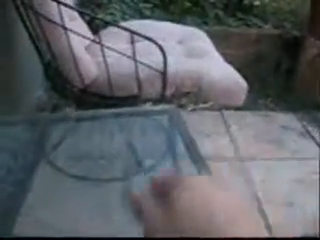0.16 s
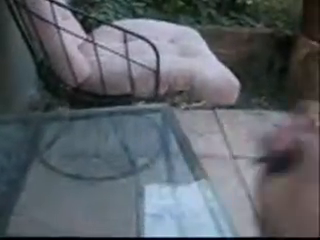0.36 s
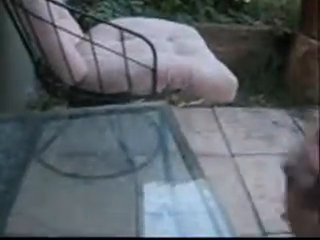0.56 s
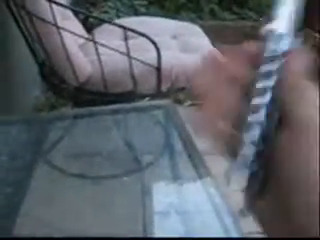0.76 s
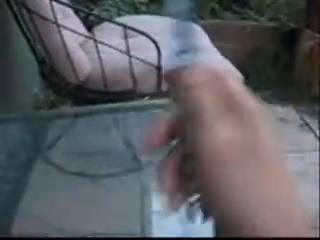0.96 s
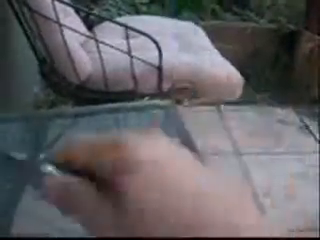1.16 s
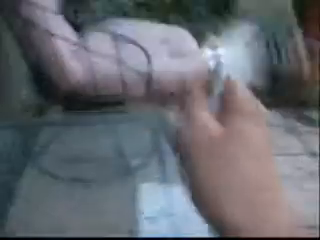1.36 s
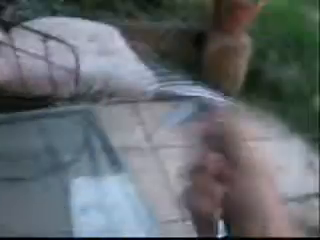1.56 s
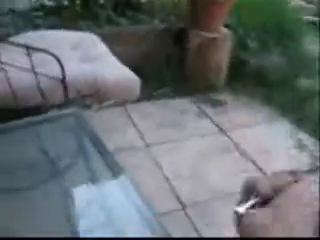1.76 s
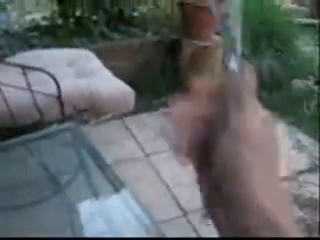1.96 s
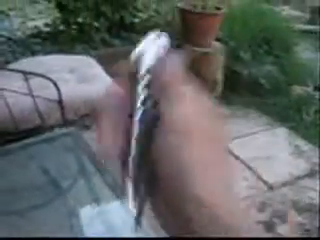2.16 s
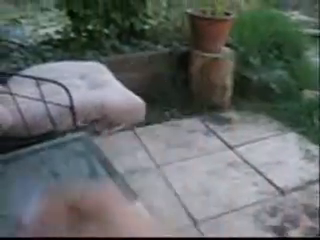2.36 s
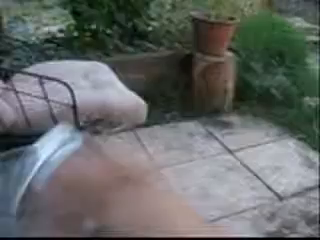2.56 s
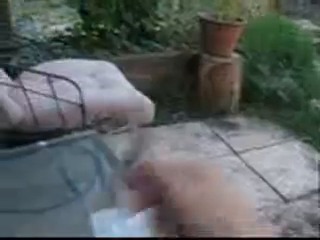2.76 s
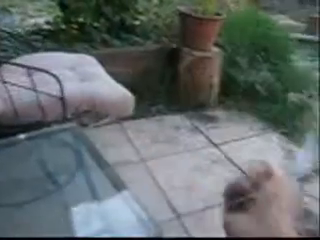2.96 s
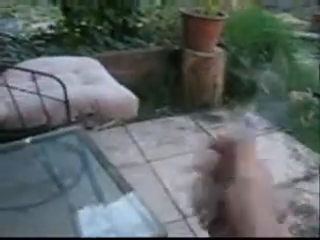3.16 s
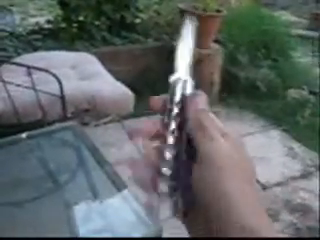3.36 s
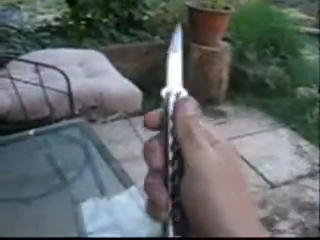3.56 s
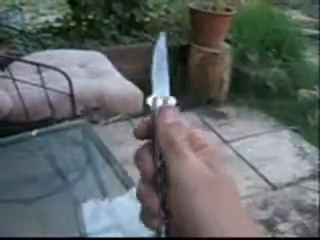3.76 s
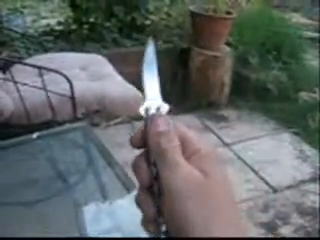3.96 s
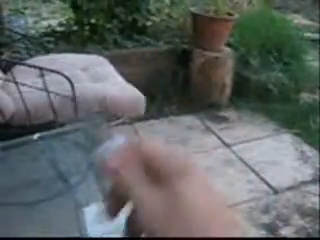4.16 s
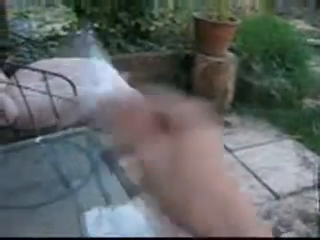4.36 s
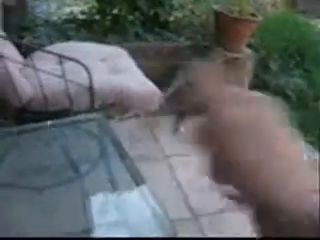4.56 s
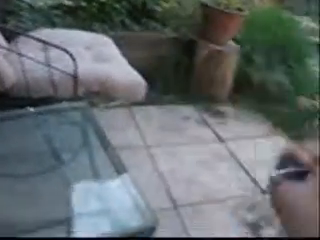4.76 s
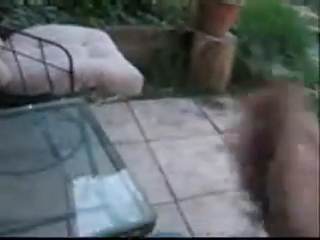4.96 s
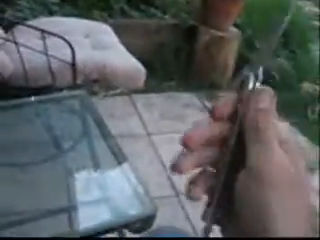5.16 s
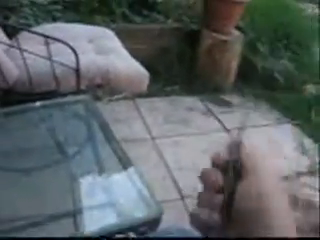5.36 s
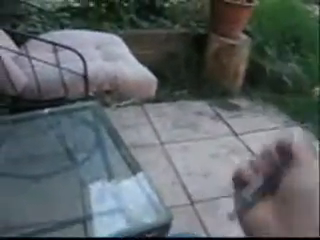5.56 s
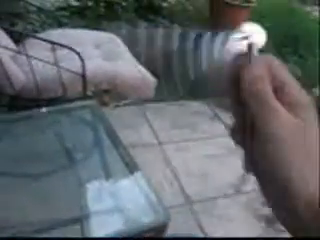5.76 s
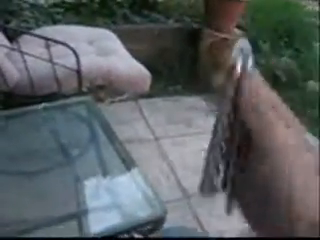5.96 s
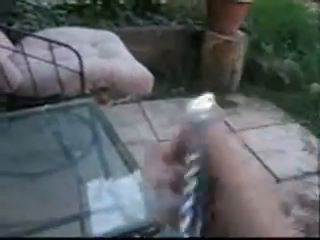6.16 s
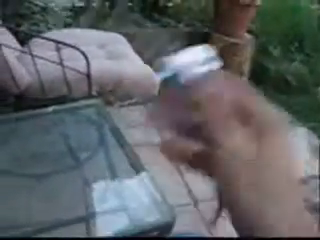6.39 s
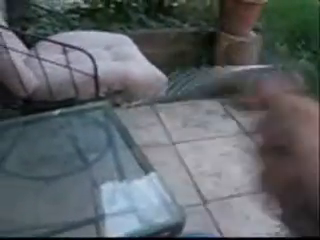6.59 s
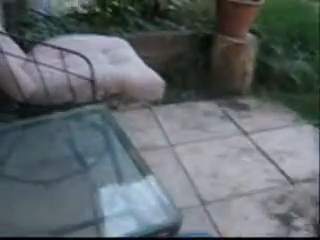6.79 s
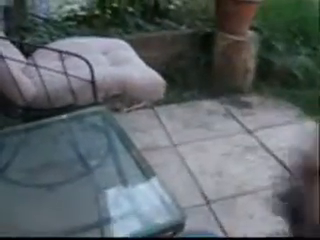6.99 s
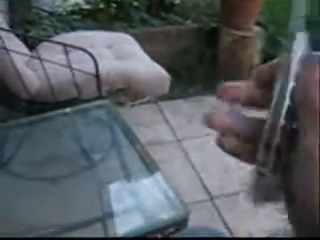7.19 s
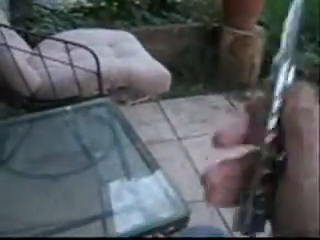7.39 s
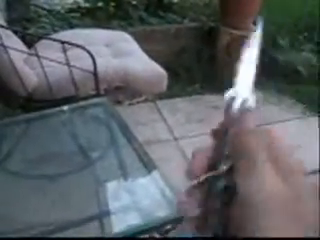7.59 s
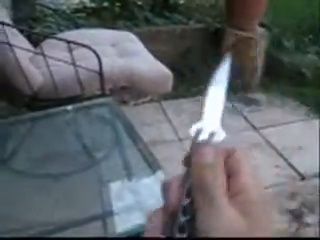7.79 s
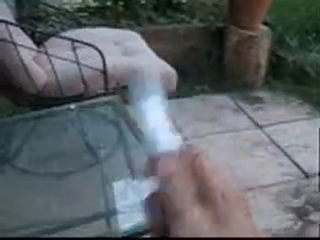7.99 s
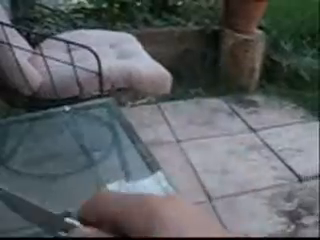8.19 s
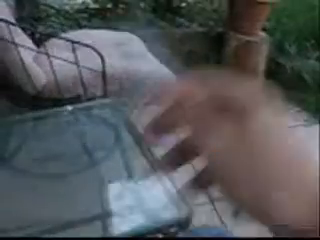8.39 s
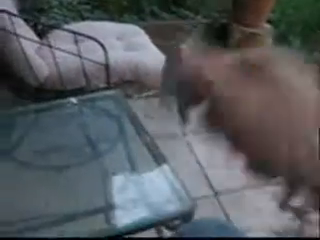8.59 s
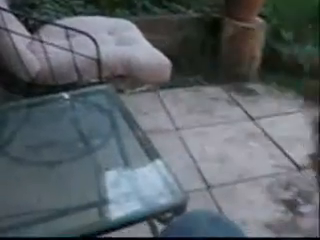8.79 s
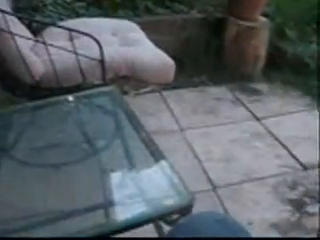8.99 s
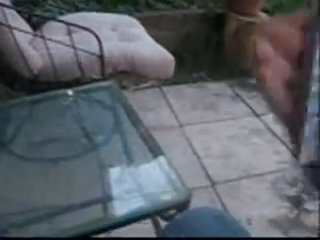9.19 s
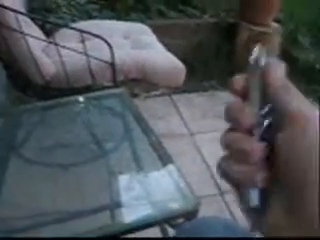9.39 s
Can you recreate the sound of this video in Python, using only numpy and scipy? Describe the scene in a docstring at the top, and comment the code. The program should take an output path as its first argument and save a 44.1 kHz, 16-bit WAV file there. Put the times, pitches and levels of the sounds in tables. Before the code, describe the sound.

A folding knife is flipped open and shut outdoors, steel handles and blade clacking in quick bursts over faint distant traffic.

```python
"""Flipping a folding knife on a patio

Steel handles and blade clack, bounce and ring close to a small camera. Far traffic, a hum and a
climbing engine sit behind. Many loud clacks come with a pop, after which the background sinks and
swells back. The camera stores sound in coarse steps, so faint sound breaks into ticks and silence."""
import sys
import numpy as np
from scipy import signal
from scipy.fft import rfft, irfft, next_fast_len
from scipy.io import wavfile
from scipy.ndimage import map_coordinates

SR = 44100
rng = np.random.default_rng(int(sys.argv[2]) if len(sys.argv) > 2 else 0)


def output_pcm(signal):
    """Save a mono or channel-first signal as 16-bit PCM at the path in sys.argv[1].

    Samples are clipped to [-1, 1] before scaling.
    """
    pcm = np.clip(np.atleast_2d(signal).T, -1, 1) * 32767
    wavfile.write(sys.argv[1], SR, np.round(pcm).astype(np.int16))


N = 416304

# pops: t/s, size/dB, background drop/dB
POP_EVENTS = [(0.431, -24.5, -3.5), (0.458, -27, -8.5), (.465, -23, -7.5), (0.807, -29, -7),
              (.843, -35, -10), (1.446, -25.5, -7.5), (1.849, -23.5, -16), (2.062, -28, -4),
              (2.102, -31.5, -5), (2.871, -28.5, -4.5), (3.145, -19, -14.5), (3.336, -30.5, -12),
              (4.326, -20, -7), (4.559, -24.5, -7), (4.583, -26.5, -12.5), (5.486, -27, -2),
              (5.817, -15, -15.5), (5.867, -36, -11), (6.472, -22.5, -8.5), (6.564, -42.5, -11),
              (7.063, -27.5, -3), (7.249, -29.5, -10), (8.375, -25.5, -3), (8.638, -20.5, -19.5),
              (9.013, -21.5, -11.5), (9.257, -28.5, -7), (9.29, -30, -6)]


def amp(db):
    return 10 ** (np.asarray(db) / 20)


def unit(x):
    return x / np.sqrt(np.mean(x ** 2) + 1e-20)


def curves(rows):
    """One value per sample for each column after the time."""
    s, *cols = np.transpose(rows)
    return [np.interp(np.arange(N) / SR, s, c) for c in cols]


def wobble(rate):
    """A smooth random curve, rate points a second."""
    return map_coordinates(rng.standard_normal(int(N * rate / SR) + 4), [np.arange(N) * rate / SR])


def coloured(x, points):
    """Filter x by (f/Hz, gain/dB) points."""
    size = next_fast_len(N + 8192)
    hz, db = np.transpose(points)
    gain_db = np.interp(np.log(np.fft.rfftfreq(size, 1 / SR) + 1), np.log(hz), db)
    return irfft(rfft(x, size) * amp(gain_db), size)[:N]


def tone(hz):
    return np.sqrt(2) * np.sin(2 * np.pi * np.cumsum(hz) / SR)


def clacks():
    """Steel hits steel: the handles ring near the hit's pitch, with a crack, a knock and a rattle."""
    # t/s, relative level/dB, pitch/Hz, ring time (to fade by 60 dB)/s, knock and crack offset/dB
    hits = [(0.0655, -34.5, 4060, 0.013, -4.5), (0.211, -40.5, 2800, 0.01, -6),
            (0.255, -39.5, 3880, 0.043, -8), (0.2589, -37, 5300, 0.016, -12),
            (0.2779, -22.5, 4840, 0.0038, -19), (0.311, -34, 5100, 0.026, -1.5),
            (0.316, -37.5, 4600, 0.015, -3), (0.3446, -40, 4910, 0.015, 0),
            (0.4314, -20.5, 4100, 0.0085, -22), (0.439, -38.5, 3130, 0.013, -14),
            (0.4576, -29.5, 5130, 0.0227, -3.5), (0.4655, -30.5, 5240, 0.02, -10),
            (0.4702, -31.5, 5100, 0.01, -20), (0.522, -57, 4705, 0.039, -11),
            (0.532, -43.5, 4700, 0.016, -16), (0.543, -47, 4800, 0.03, -12.5),
            (0.576, -43.5, 4340, 0.095, -17), (0.5802, -31.5, 5080, 0.018, -21),
            (0.624, -50, 4770, 0.041, -4.5), (0.671, -45.5, 4650, 0.041, -13.5),
            (0.6931, -40, 4840, 0.031, -13), (0.7277, -19.5, 4300, 0.0092, -38),
            (0.7385, -34.5, 4400, 0.006, -11), (0.76, -21.5, 4780, 0.028, -20),
            (0.7638, -26, 4755, 0.01, -13.5), (0.7734, -36.5, 4890, 0.051, -13.5),
            (0.8089, -17, 4660, 0.013, -26), (0.8431, -22.5, 4750, 0.019, -3.5),
            (1.2487, -35.5, 5350, 0.012, -19), (1.289, -42, 4850, 0.03, -11.5),
            (1.3011, -35.5, 2412, 0.0088, -17.5), (1.3333, -45, 4840, 0.019, -11),
            (1.424, -34.5, 4000, 0.014, -15), (1.431, -38.5, 3600, 0.028, -3),
            (1.4408, -29, 3700, 0.0079, -1), (1.4459, -22.5, 4670, 0.0086, -6.5),
            (1.4592, -44, 4550, 0.029, -5), (1.4937, -19, 4510, 0.006, -22.5),
            (1.5204, -44, 4790, 0.06, -13), (1.6883, -46.5, 4880, 0.017, -28),
            (1.721, -47.5, 4776, 0.033, -15), (1.778, -41, 4200, 0.019, 0),
            (1.7997, -36.5, 3863, 0.007, -17.5), (1.8033, -30, 4050, 0.01, -13),
            (1.8497, -21.5, 4020, 0.01, -13.5), (1.8546, -30, 3930, 0.011, -3),
            (2.0567, -43, 4750, 0.077, -0.5), (2.0613, -26.5, 5045, 0.022, -5.5),
            (2.066, -33.5, 4850, 0.028, -12), (2.1016, -18.5, 5110, 0.0093, -10.5),
            (2.135, -25.5, 4500, 0.01, -17), (2.141, -29.5, 5200, 0.019, -19),
            (2.143, -38, 3720, 0.018, -23), (2.1735, -36, 5450, 0.032, -26), (2.1984, -45, 4770, 0.05, -13),
            (2.2535, -26.5, 4960, 0.0065, -22), (2.2774, -34, 5020, 0.012, -4.5),
            (2.3383, -45, 4810, 0.021, -16), (2.3826, -49, 4790, 0.034, -16),
            (2.506, -41, 5244, 0.034, -15.5), (2.546, -49, 4783, 0.024, -13.5),
            (2.591, -55.5, 4825, 0.03, 3), (2.6092, -39, 5180, 0.028, -27),
            (2.6649, -35.5, 4220, 0.022, 1.5), (2.7129, -28, 5300, 0.0093, -14.5),
            (2.7751, -35.5, 3843, 0.034, -25), (2.7894, -26, 3470, 0.0036, -9),
            (2.8044, -23.5, 5200, 0.006, -18), (2.8086, -24, 3980, 0.0075, -16),
            (2.8612, -30, 5240, 0.011, -12), (2.8649, -25, 5350, 0.0089, -16),
            (2.871, -26, 5110, 0.022, -5.5), (2.8762, -46, 5200, 0.023, -16),
            (2.9781, -43, 4800, 0.03, -17), (3.1016, -26, 4912, 0.009, -32), (3.1122, -34, 4010, 0.013, -7),
            (3.117, -42, 3570, 0.015, -5), (3.1332, -51, 3950, 0.093, 2), (3.138, -37.5, 4230, 0.0152, -19),
            (3.1452, -19, 4920, 0.011, -14.5), (3.153, -37.5, 3420, 0.058, -15),
            (3.159, -25.5, 4670, 0.015, -14), (3.1622, -37, 3870, 0.017, -22),
            (3.1733, -36, 4650, 0.008, -21), (3.2713, -49, 4840, 0.037, -17.5),
            (3.314, -33, 5040, 0.013, -25), (3.319, -42.5, 5100, 0.064, -11),
            (3.3362, -19, 4880, 0.0187, -14.5), (3.344, -34.5, 5150, 0.017, -12),
            (3.3679, -22.5, 3570, 0.009, -18), (3.4695, -44, 3970, 0.021, -15.5),
            (3.491, -45.5, 4760, 0.0301, -17), (4.2102, -42.5, 5110, 0.027, -1),
            (4.2374, -37, 5250, 0.0141, -7), (4.3258, -29.5, 4970, 0.0093, -7.5),
            (4.3306, -25.5, 5390, 0.0099, -19), (4.3353, -26.5, 5430, 0.0092, -15),
            (4.3394, -24.5, 5180, 0.0102, -40), (4.359, -43, 2715, 0.031, -11),
            (4.368, -34.5, 5330, 0.0074, -21), (4.3749, -27.5, 5280, 0.016, -20),
            (4.391, -26, 5470, 0.023, -30), (4.5174, -38, 3970, 0.021, -20),
            (4.528, -36.5, 5360, 0.014, -7), (4.543, -39.5, 4504, 0.048, 1), (4.548, -51, 4800, 0.022, -4),
            (4.558, -25, 4600, 0.016, -6), (4.5771, -27, 4800, 0.022, -6.5),
            (4.5818, -22, 4020, 0.011, -13), (4.5857, -37.5, 3970, 0.031, -17),
            (4.626, -50.5, 4690, 0.03, -3), (4.6977, -49.5, 4740, 0.03, -15),
            (4.7513, -37.5, 5286, 0.013, -6), (4.8443, -33, 5360, 0.012, -10.5),
            (4.8725, -40.5, 2840, 0.021, 6), (4.9207, -22, 4900, 0.016, -11.5),
            (5.0187, -40, 4030, 0.0087, 0.5), (5.0615, -36, 4040, 0.024, 0), (5.127, -27, 3996, 0.011, -16),
            (5.1557, -31, 4150, 0.0064, -18), (5.2533, -41.5, 3160, 0.0097, -12),
            (5.266, -37, 4520, 0.029, 0.5), (5.295, -33.5, 4130, 0.029, -8),
            (5.305, -36.5, 4750, 0.0097, -6), (5.331, -31.5, 4900, 0.011, -14),
            (5.3348, -31, 5000, 0.027, -30), (5.436, -43.5, 3872, 0.064, 1),
            (5.442, -38.5, 4140, 0.041, -11), (5.4621, -34.5, 4060, 0.0098, -11),
            (5.4794, -32, 4660, 0.006, -11), (5.486, -24.5, 4705, 0.011, -28),
            (5.7972, -32, 4190, 0.0076, -10), (5.803, -40, 4300, 0.071, -7),
            (5.808, -31, 4190, 0.0173, -10.5), (5.817, -27, 3805, 0.0092, -0.5),
            (5.8185, -33.5, 4800, 0.042, -17), (5.8693, -20, 4350, 0.0095, -31.5),
            (5.8722, -33, 4430, 0.025, -19.5), (5.896, -37, 4470, 0.021, -19),
            (5.902, -21, 4900, 0.012, -26), (5.9077, -40.5, 4500, 0.028, -19),
            (6.103, -53.5, 4730, 0.017, -13.5), (6.1548, -56, 4560, 0.03, -9),
            (6.2881, -44.5, 4800, 0.029, -34), (6.4109, -35.5, 4000, 0.011, -7),
            (6.4408, -39, 3860, 0.006, -7), (6.445, -22, 4500, 0.011, -34),
            (6.4714, -24, 4230, 0.0145, -17.5), (6.4811, -40.5, 4260, 0.033, -17.5),
            (6.549, -55, 4830, 0.0206, -15), (6.5629, -21.5, 4590, 0.025, -23),
            (6.6015, -22.5, 4740, 0.024, -23.5), (6.6202, -39.5, 4510, 0.0125, -6.5),
            (6.6261, -36.5, 4010, 0.025, -21.5), (6.8848, -45.5, 4800, 0.021, -20),
            (6.9062, -33, 4850, 0.012, -10), (6.943, -54.5, 4920, 0.039, -15),
            (6.9604, -34, 4656, 0.011, -32.5), (6.991, -38.5, 3680, 0.025, -6.5),
            (7.0609, -36, 4230, 0.023, -18), (7.0661, -19.5, 5140, 0.0091, -27),
            (7.086, -36.5, 4360, 0.012, -17), (7.1923, -27.5, 4150, 0.013, -8.5),
            (7.2483, -17.5, 3830, 0.0056, -13), (7.2628, -27, 4820, 0.024, -23.5),
            (7.276, -31.5, 3420, 0.0099, -19), (7.3088, -47, 4860, 0.019, -16),
            (7.3392, -47.5, 4800, 0.034, -15.5), (7.4974, -48, 4843, 0.028, -25),
            (7.5146, -48.5, 4820, 0.025, -6), (7.7296, -42, 3750, 0.0274, -15),
            (8.3739, -25.5, 3900, 0.016, -21), (8.3796, -25, 5410, 0.013, -12.5),
            (8.429, -32, 3440, 0.017, -2.5), (8.502, -32.5, 3185, 0.012, -0.5),
            (8.5245, -28.5, 4070, 0.0067, -9), (8.5795, -43, 4300, 0.03, -2),
            (8.5876, -39.5, 4960, 0.034, -12), (8.606, -39, 4118, 0.02, 1),
            (8.6153, -42.5, 4140, 0.0236, 2), (8.6293, -33.5, 4100, 0.007, -2),
            (8.6377, -25, 3900, 0.02, -4.5), (8.6441, -35.5, 3540, 0.052, -11),
            (8.649, -26.5, 4430, 0.0069, -11), (8.654, -27, 4170, 0.016, -20),
            (8.689, -54, 4870, 0.025, -16), (8.726, -42, 4341, 0.029, -17),
            (8.9451, -50.5, 4779, 0.03, -16), (9.013, -18, 4330, 0.0068, -9),
            (9.017, -34.5, 5130, 0.015, -1), (9.0336, -43, 5080, 0.015, -11),
            (9.139, -55.5, 4741, 0.02943, -11), (9.1917, -31.5, 5380, 0.025, -17),
            (9.2066, -33, 5280, 0.025, -12), (9.227, -40.5, 5410, 0.03, -19),
            (9.2385, -25, 5470, 0.013, -30), (9.2577, -18.5, 5430, 0.012, -11.5),
            (9.2619, -31, 5440, 0.013, -31), (9.2725, -19.5, 4560, 0.01, -32),
            (9.2788, -26.5, 4620, 0.0049, -22), (9.282, -29, 5000, 0.015, -29),
            (9.2895, -17, 5170, 0.024, -9.5), (9.3422, -46.5, 4860, 0.03, -15),
            (9.3786, -31.5, 5400, 0.0148, -7.5), (9.382, -29.5, 5050, 0.064, -24),
            (9.3867, -33.5, 4700, 0.05, -10), (9.408, -57.5, 4769, 0.03, -22)]
    # the handles' own notes: f/Hz, level/dB
    handle_notes = [(1650, -9), (2350, -6), (3050, -4), (3650, -1.5), (4150, -0.5), (4600, -1.5),
                    (4950, -1.5), (5200, -0.5), (5320, 1.5), (5450, -1)]
    hz, note_db = np.transpose(handle_notes)[:, :, None]
    out, t = np.zeros(N + SR), np.arange(SR // 12) / SR
    knock_band = signal.butter(2, [250, 1600], "bandpass", fs=SR, output="sos")
    for start, db, pitch_hz, fade_s, knock_db in hits:
        near_db = np.maximum(-15, -55 * abs(np.log(hz / pitch_hz)))
        uneven, detune, phase = rng.standard_normal((3, len(hz), 1))
        notes = np.sin(2 * np.pi * hz * (1 + .017 * detune) * t + .8 * phase)
        ring = (amp(note_db + near_db + 3 * uneven) * notes).sum(0)
        ring /= np.sqrt(np.mean(ring[:80] ** 2))
        ring *= amp(-60 * t / max(fade_s, .003))
        noise = rng.standard_normal((2, len(t)))
        crack = amp(knock_db + 12) * noise[0] * amp(-60 * t / .0046)
        snap = -1.2 * np.sin(2 * np.pi * 2600 * t) * np.exp(-t / .00034)  # the first touch
        rattle = amp(-16.5) * noise[0] * amp(-60 * t / .11)  # loose pins and the paving answer
        knock = amp(knock_db - 3.5) * unit(signal.sosfilt(knock_band, noise[1])) * amp(-60 * t / .018)
        blow = snap - ring + crack + rattle + knock
        out[round(start * SR):][:len(t)] += amp(db + 3.5) * blow * (1 - np.exp(-t / .00025))
    return out[:N]


def blade(low_hz=3914, high_hz=5294, turn_hz=4):
    """The free blade sings: its low note fades and dips as it turns edge-on, its high note swells."""
    # t/s, length/s, low note/dB, high note/dB, time to the high note's peak/s
    swings = [(.844, .122, -39.5, -33.5, .043), (1.588, .088, -69, -51, .05), (2.873, .08, -63, -52, .035),
              (3.375, .05, -53, -59, .005), (4.343, .07, -65, -47, .01), (5.82, .05, -65, -41.5, .018),
              (5.9, .055, -52, -66, .04), (7.728, .078, -75.5, -56.5, .03), (8.383, .12, -50, -70, .02),
              (8.73, .06, -66.5, -59, .03), (9.193, .068, -69, -48, .025)]
    low, high = np.zeros((2, N + SR))
    for start, length, low_db, high_db, peak in swings:
        i, t = round(start * SR), np.arange(round(length * SR)) / SR
        turn = .05 + abs(np.cos(2 * np.pi * turn_hz * t))
        ending = np.minimum(1, (length - t) / .0093)
        low[i:][:len(t)] += amp(low_db - 131 * t) * turn * ending
        from_peak = np.clip((t - peak) / (length - peak), -1, 1)
        high[i:][:len(t)] += amp(high_db) * np.cos(np.pi / 2 * from_peak) ** 2
    return low[:N] * tone(np.full(N, low_hz)) + high[:N] * tone(np.full(N, high_hz))


def hiss(rise_db_per_s=1200, fall_db_per_s=889):
    """Short stretches of faint, grainy hiss and ticking."""
    # hiss stretches: t/s, length/s
    stretches = [(0.477, 0.0038), (.539, .004), (0.59, 0.0094), (0.703, 0.26), (1.25, 0.0024),
                 (1.288, 0.38), (1.753, 0.16), (2.057, 0.17), (2.28, .004), (2.511, 0.0034), (2.614, .004),
                 (2.696, 0.0059), (3.155, 0.065), (3.289, 0.14), (3.48, 0.0068), (4.576, 0.013),
                 (4.7, 0.0048), (4.764, 0.0049), (4.835, 0.11), (5.875, 0.098), (6.241, .003),
                 (6.282, 0.23), (6.547, 0.11), (6.888, 0.0051), (6.971, 0.12), (7.185, 0.11), (8.65, 0.028),
                 (8.721, 0.063), (8.823, 0.078), (8.961, 0.1), (9.185, 0.15), (9.383, 0.018)]
    colour = [(300, -11.5), (2000, -7.5), (4000, -5), (4900, -4), (5350, 2), (6000, -40)]
    grain = amp(2 * wobble(120)) * coloured(rng.standard_normal(N), colour)
    t, db = np.arange(N) / SR, np.full(N, -60.)
    for start, length in stretches:
        ramp_db = np.minimum(rise_db_per_s * (t - start), fall_db_per_s * (start + length - t))
        db = np.maximum(db, np.minimum(0, ramp_db))
    return amp(db - 55) * unit(grain)


def pops():
    """The wave drops suddenly and eases back in a few milliseconds."""
    out, t = np.zeros(N + SR), np.arange(SR // 20) / SR
    for start, db, _ in POP_EVENTS:
        out[round(start * SR):][:len(t)] -= amp(db) * np.exp(-t / .0041) * (1 - np.exp(-t / .000096))
    return out[:N]


def sinking(swell_db_per_s=26):
    """The background's volume falls at each pop and climbs back steadily."""
    db, t = np.zeros(N), np.arange(N) / SR
    for start, _, drop_db in POP_EVENTS:
        i = round(start * SR)
        db[i:] = np.minimum(0, db[i] + drop_db + swell_db_per_s * (t[i:] - start))
    return amp(db)


def outdoors():
    """A wash of far traffic, a low rumble and a wavering hum."""
    # before sinking: t/s, traffic/dB, rumble/dB, hum pitch/Hz, hum/dB
    background = [(0, -45, -53, 129.5, -52), (1.5, -47.5, -51.5, 130, -54), (2.8, -47, -53, 130, -50),
                  (3.7, -43, -51, 131, -48), (4.1, -42.5, -51.5, 131, -51), (4.5, -48, -47.5, 124.3, -52.5),
                  (4.93, -46.5, -61.5, 124, -56), (4.98, -34, -45, 122, -39.5),
                  (5.04, -35.5, -49.5, 124, -50.5), (5.12, -44.5, -44.5, 125.7, -54.5),
                  (5.7, -45.5, -47.5, 125.2, -52.5), (6.5, -44.5, -52.5, 124.4, -54),
                  (7.8, -46.5, -52.5, 124.8, -68.5), (9.44, -44, -59, 125.4, -51.5)]
    # tone colours of the two noises: f/Hz, gain/dB
    traffic_colour = [(100, -20), (230, -2.5), (450, -6.5), (880, -5.5), (1500, -12), (3000, -20),
                      (5500, -25)]
    rumble_colour = [(15, -23), (30, -3), (55, -2), (90, -7), (160, -22), (400, -59)]
    traffic_db, rumble_db, hum_hz, hum_db = curves(background)
    traffic = amp(traffic_db + 1.2 * wobble(7.2)) * unit(coloured(rng.standard_normal(N), traffic_colour))
    rumble = amp(rumble_db + 1.5 * wobble(4)) * unit(coloured(rng.standard_normal(N), rumble_colour))
    hum = amp(hum_db + 3.5 * wobble(13)) * tone(hum_hz + 2.5 * wobble(11))
    return traffic + rumble + hum


def engine():
    """An engine's low note climbs as it gathers speed."""
    # before sinking: t/s, f/Hz, level/dB
    climb = [(7.4, 54.32, -69), (7.7, 55.12, -56), (7.9, 56.25, -41.5), (8.2, 59.6, -47.5),
             (8.3, 63.7, -38.5), (8.63, 71.5, -45.5), (9.44, 78.28, -55)]
    hz, db = curves(climb)
    return amp(db + 2.7 * wobble(7.9)) * tone(hz + 1.5 * wobble(9.2))


def scene():
    return (clacks() + blade() + hiss() + pops() + sinking() * (outdoors() + engine()))[None]


def record(dry, step=1 / 128, top_hz=12950):
    """The camera rounds every fourth sample to 8 bits and holds it, mirroring the treble upward."""
    # smoothing filter: f/Hz, gain/dB
    smoothing = [(3000, -1.5), (5500, -0.5), (8000, -1), (10000, -1), (12500, -2)]
    band = signal.sosfilt(signal.butter(6, 5900, fs=SR, output="sos"), dry[0])
    steps = np.round(band[::4] / step - .11) * step
    held = coloured(np.repeat(steps, 4)[:N], smoothing)
    return coloured(held, [(top_hz, 0), (top_hz + 400, -35), (top_hz + 1100, -120)])[None]


dry = scene()
out = record(dry)
output_pcm(out)
```